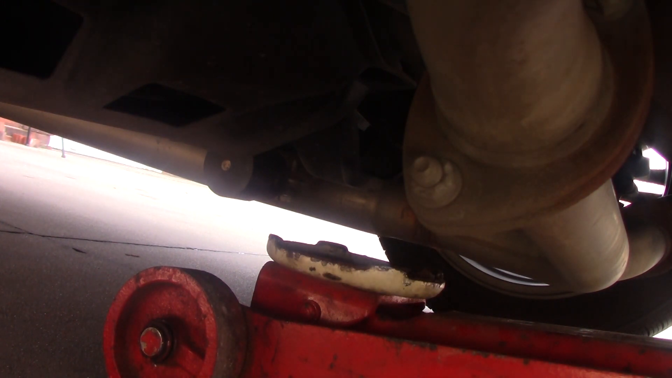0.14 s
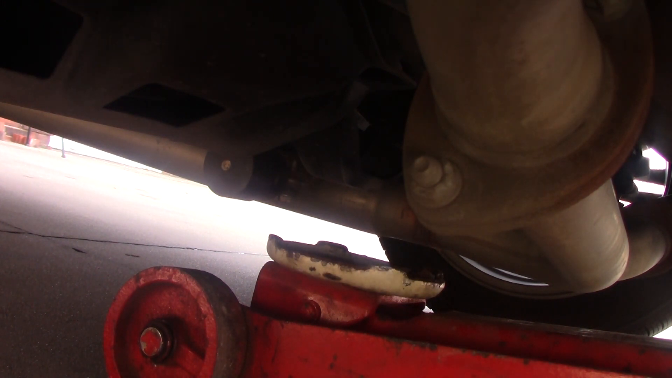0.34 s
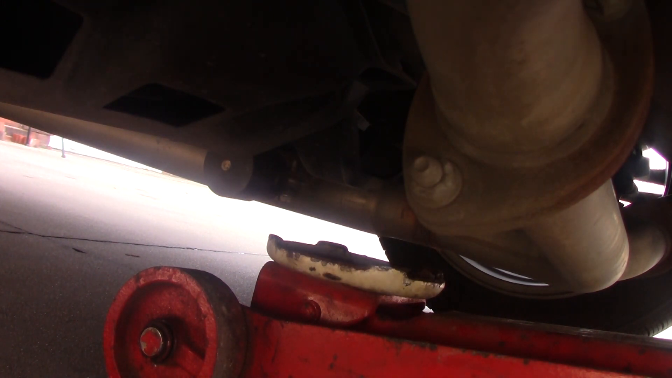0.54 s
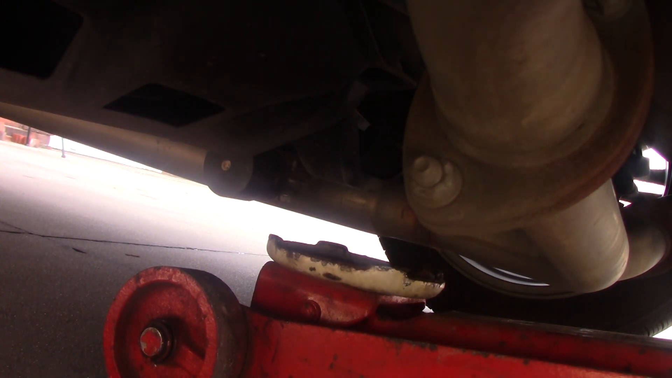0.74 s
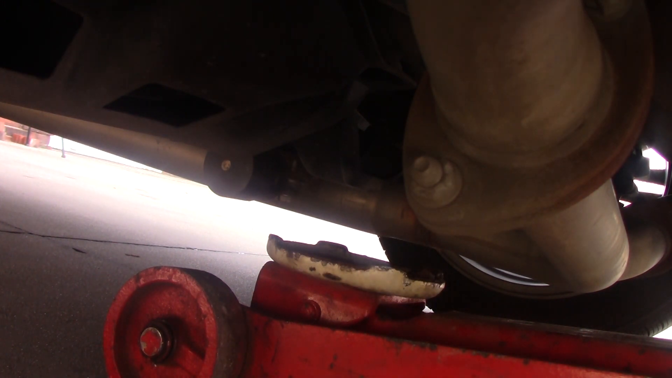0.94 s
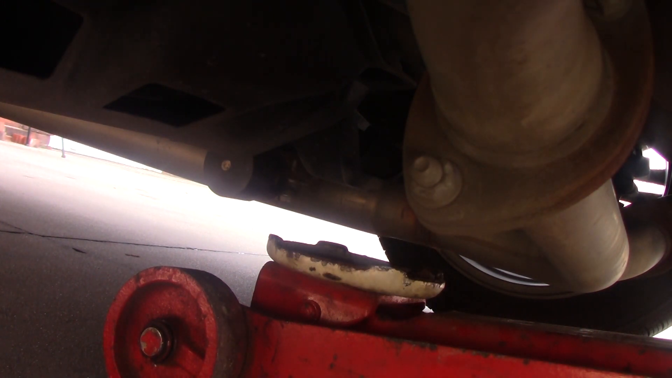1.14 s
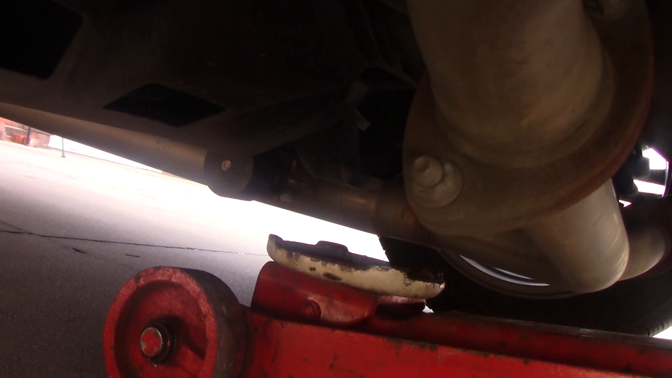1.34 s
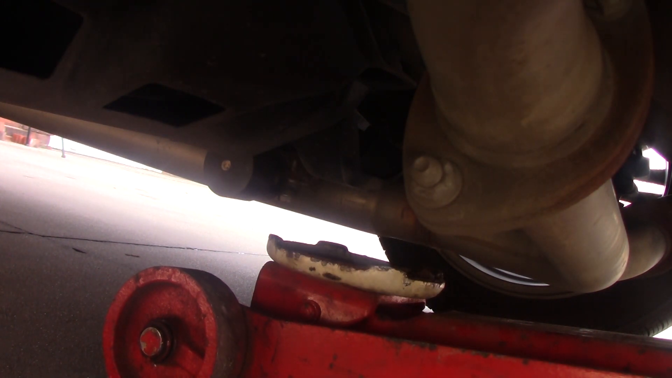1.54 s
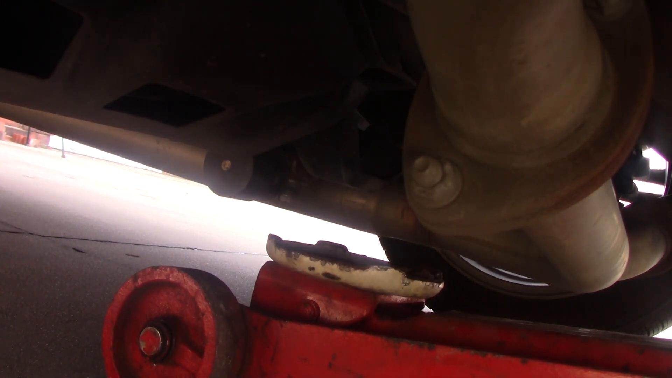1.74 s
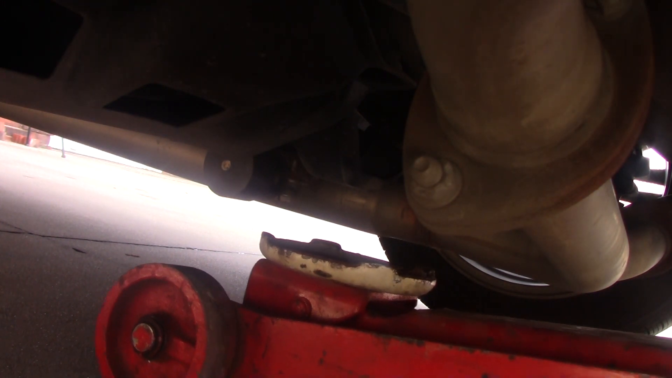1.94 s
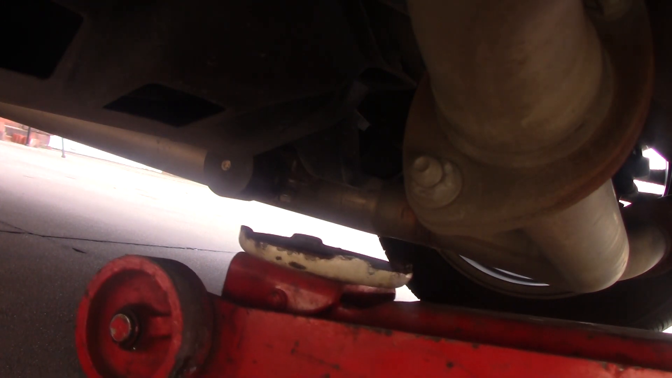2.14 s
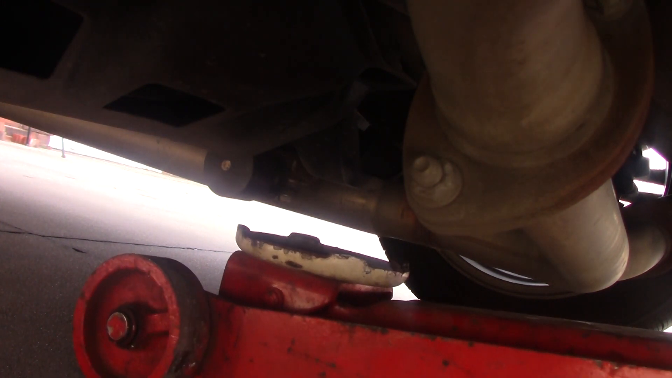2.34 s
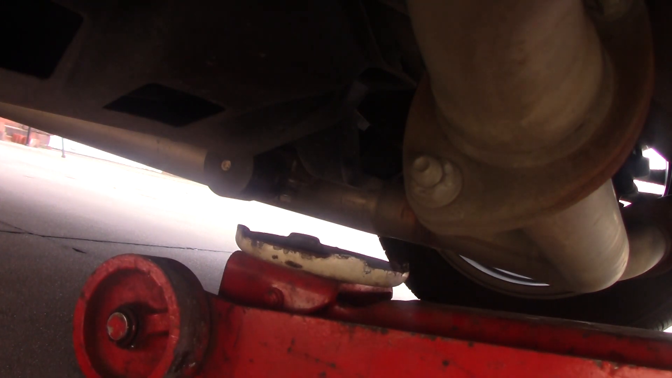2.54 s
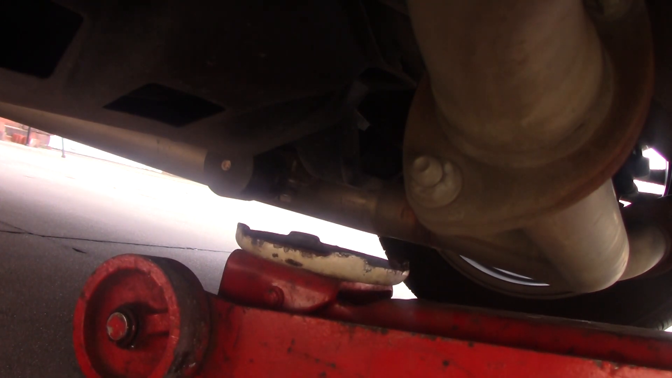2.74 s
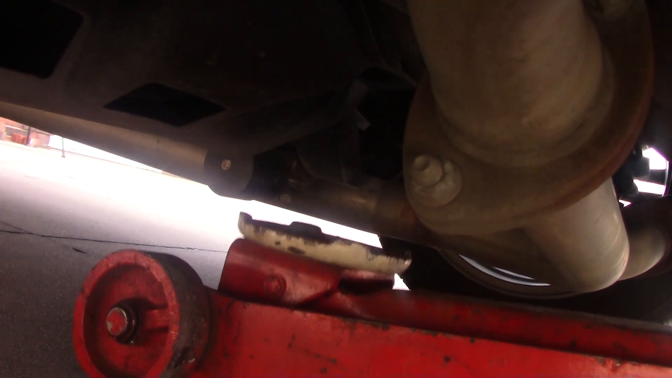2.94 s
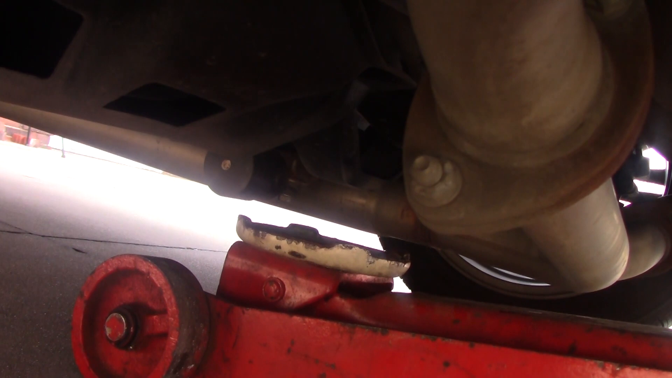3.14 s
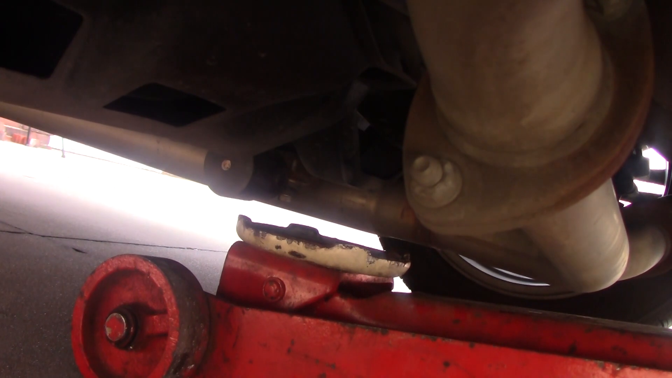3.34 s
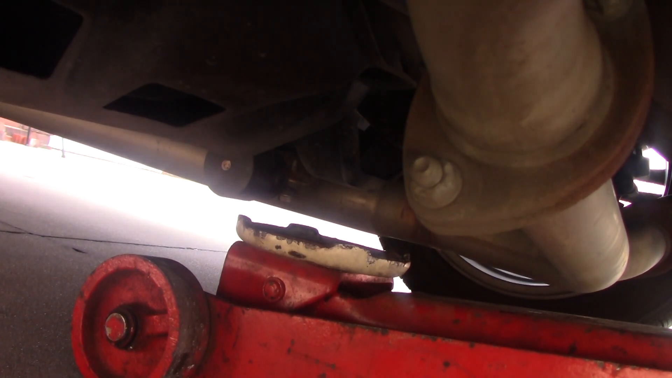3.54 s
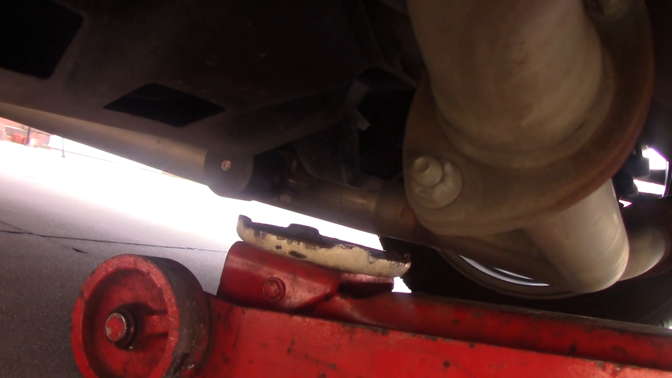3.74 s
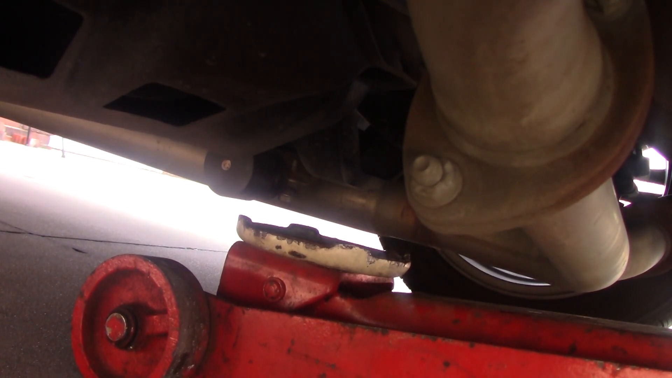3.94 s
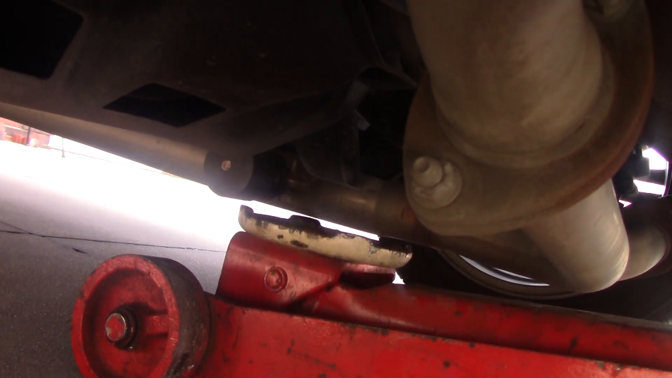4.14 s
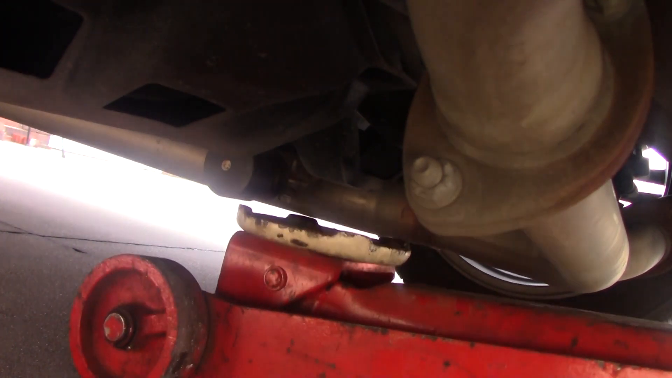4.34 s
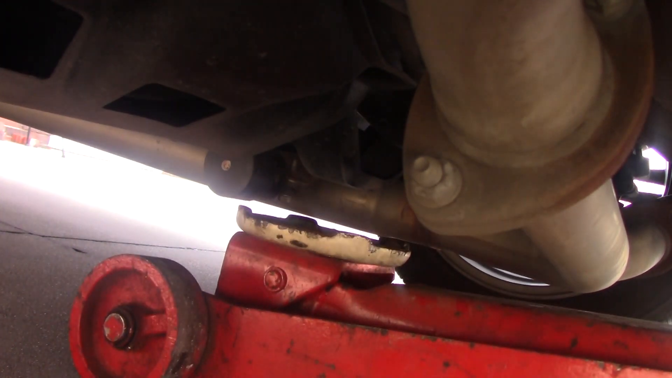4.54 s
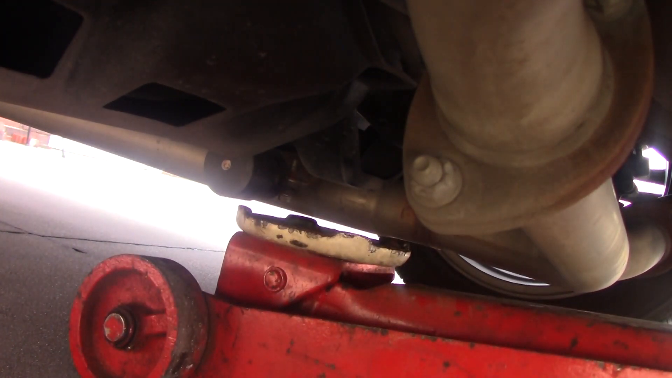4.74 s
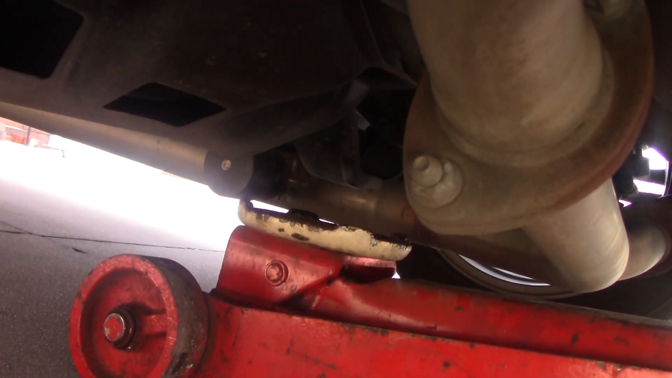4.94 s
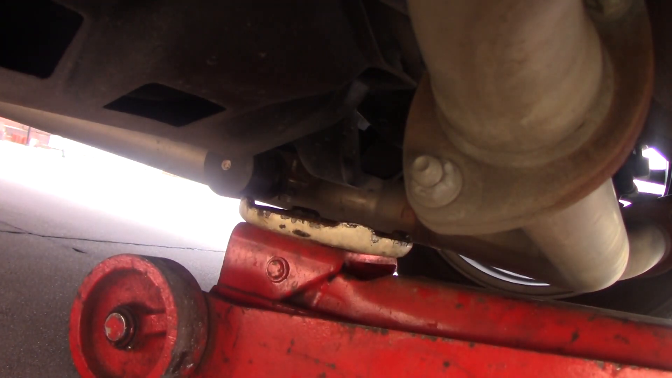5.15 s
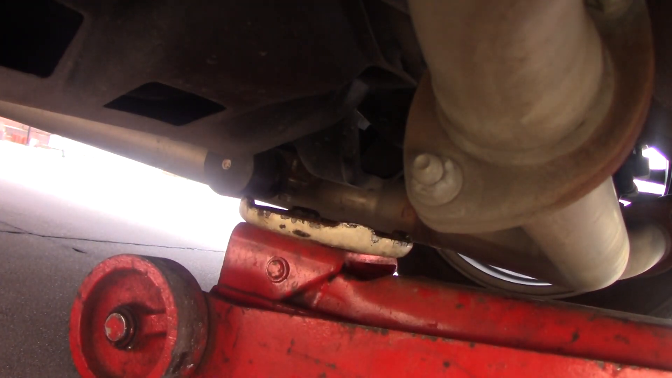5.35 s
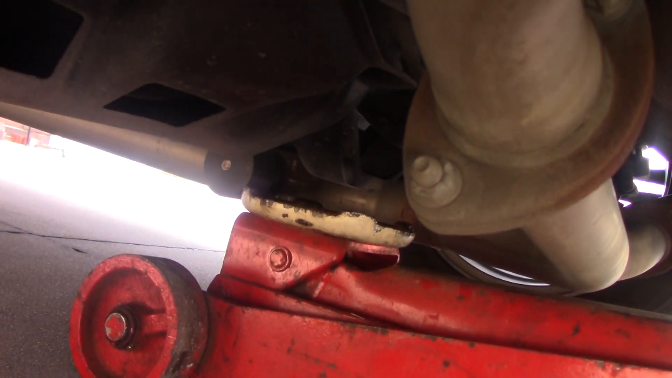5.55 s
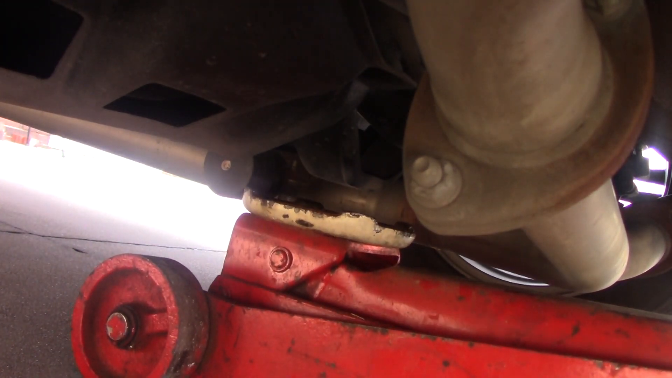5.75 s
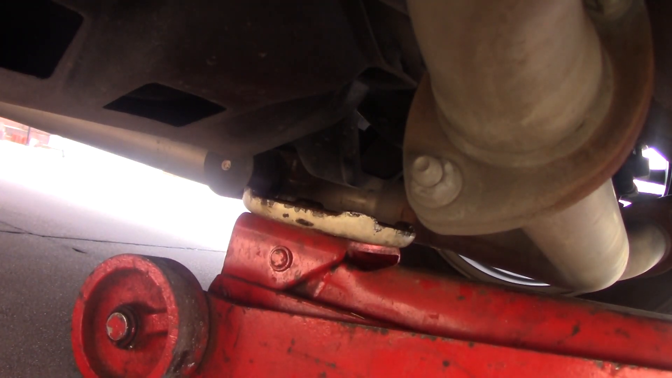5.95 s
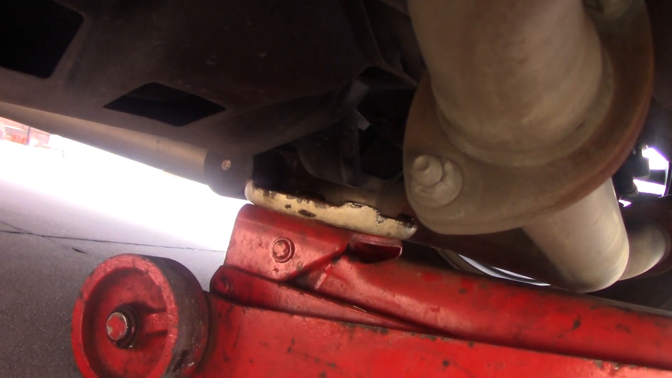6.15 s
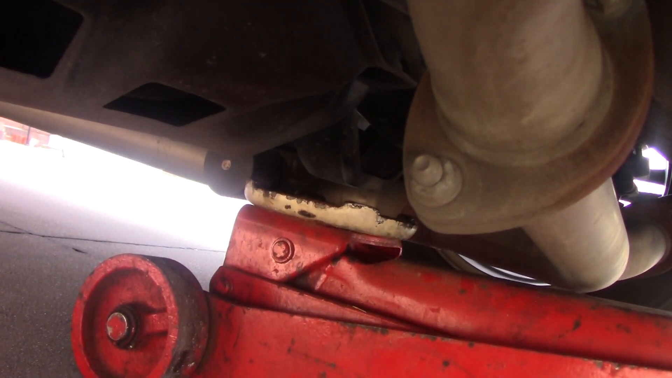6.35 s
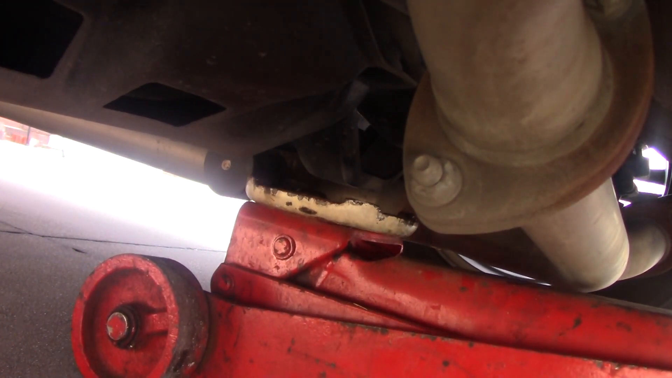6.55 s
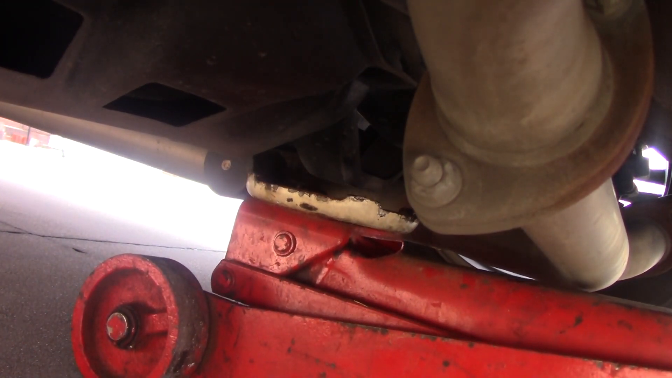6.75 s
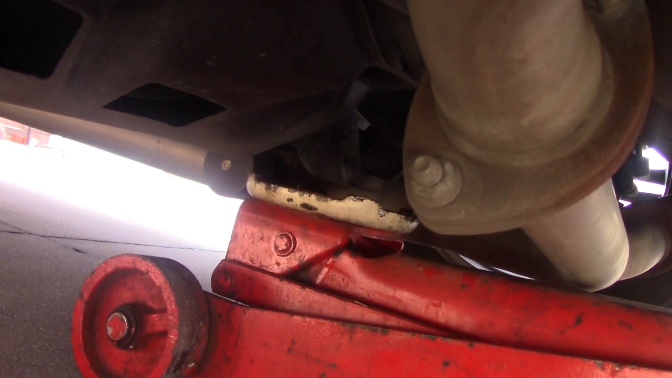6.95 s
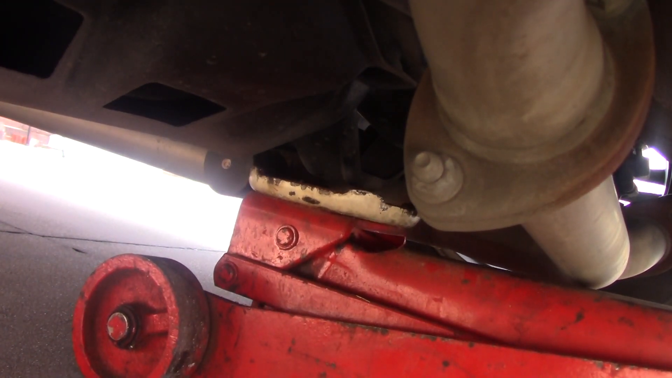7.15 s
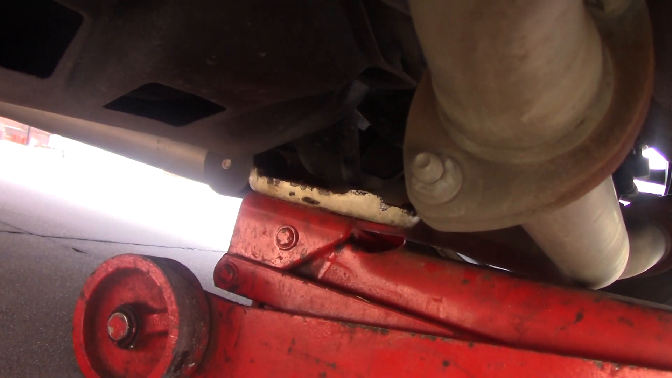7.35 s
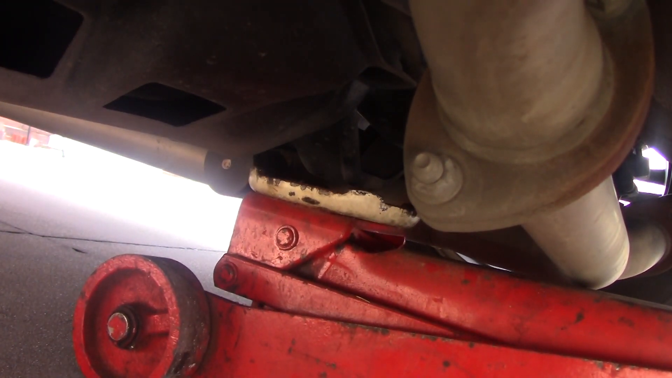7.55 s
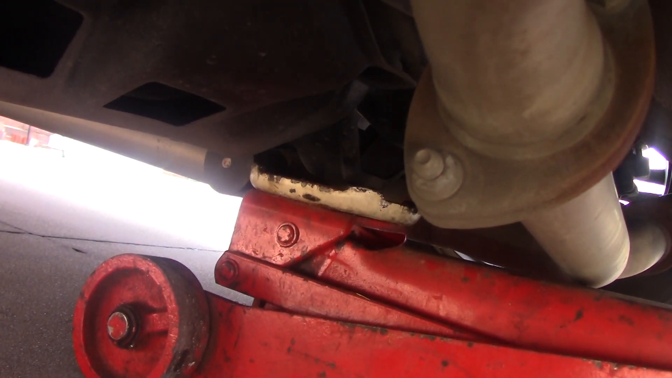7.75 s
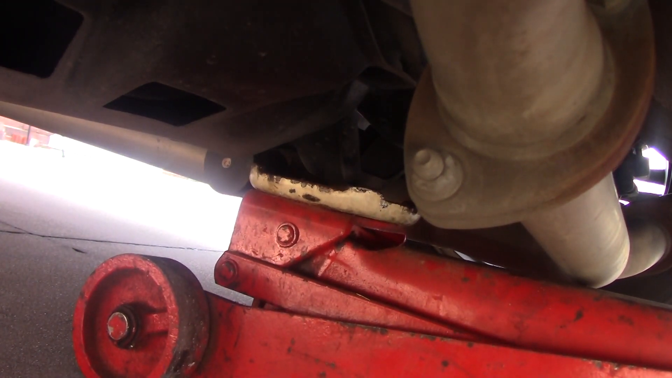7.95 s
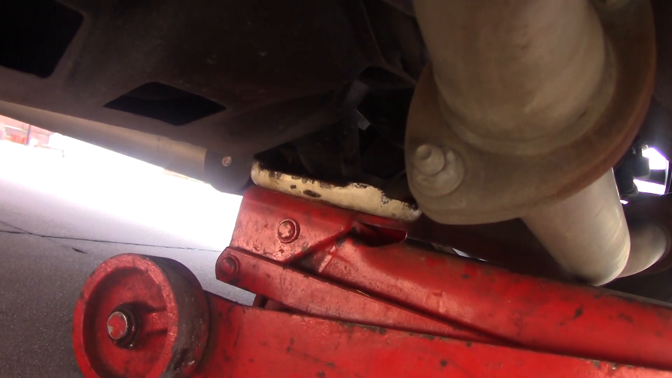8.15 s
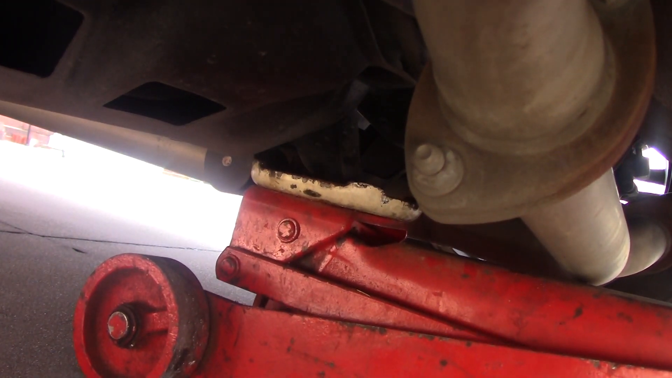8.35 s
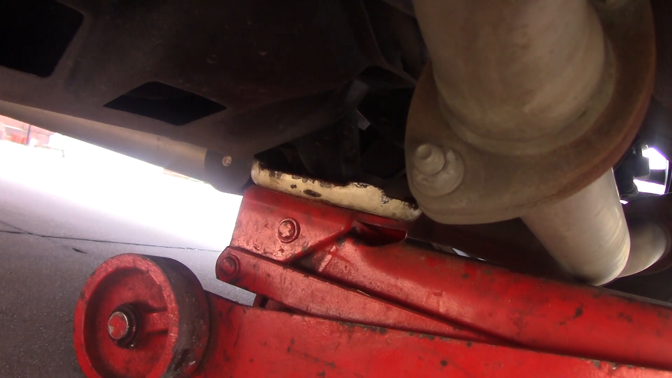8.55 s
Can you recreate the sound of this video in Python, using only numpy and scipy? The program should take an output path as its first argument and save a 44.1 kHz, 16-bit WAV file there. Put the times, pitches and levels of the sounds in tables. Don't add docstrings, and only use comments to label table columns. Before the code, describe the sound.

Low on concrete beneath a car, a soft outdoor rumble of distant traffic and air runs throughout. From 0 to 0.5 s, shoe or cloth scuffs, gritty crunches and light frame thumps; a small bump at 0.87, a lone tick at 1.08, faint knocks and grit at 1.66-1.95. At about 1.97-2.35 a dry caster squeals harshly, jumping up, then dropping and wavering with bright overtones. Clanks start at 2.4, with a heavy frame thump at 2.7. Dense clicking and rattling at 3.0-3.3 includes a brief singing tube tone; a short lull follows. Strong hollow thumps hit near 4.0, 4.85 and 5.4, between bright ringing clatter, especially 4.25-4.5. From 5.6 to 8.6, irregular rapid steel clanks, pin clicks and saddle knocks continue, close and hard with short echoes, while the rumble ducks beneath them.

```python
import sys
import numpy as np
from scipy import signal
from scipy.fft import rfft, irfft, next_fast_len
from scipy.io import wavfile
from scipy.ndimage import uniform_filter1d

SR = 44100
rng = np.random.default_rng(int(sys.argv[2]) if len(sys.argv) > 2 else 0)


def transcribe(u):
    v = np.clip(np.atleast_2d(u).T, -1, 1)
    q = np.round(v * 32767).astype(np.int16)
    wavfile.write(sys.argv[1], SR, q)


def elevation(decibels):
    levels = np.asarray(decibels, float)
    return 10 ** (levels / 20)


N = 379701
T = np.arange(N) / SR
SIZE = 8192
HZ = np.fft.rfftfreq(SIZE, 1 / SR)

# pitch_hz, width_hz, level_db
STEEL_RINGS = [(1063, 55, -5), (1247, 130, 1.5), (1576, 122, -9.5), (2368, 43, 0.5), (2752, 51, -9.5),
               (3218, 38, -1.5), (3910, 76, -8), (4230, 190, -6.5), (4980, 34, -11), (5404, 106, -5),
               (6730, 130, -22), (7440, 67, -12.5), (9730, 57, -12)]
# pitch_hz, width_hz, level_db
FRAME_RINGS = [(78.5, 46, -13.5), (129, 45, -7), (171.6, 60, -6), (253, 63, 1.5), (281.7, 50.4, 0),
               (344, 34.6, 6.5), (407.5, 50, -0.5), (491, 73, -7), (586, 54, 1), (684, 42, 0.5)]


def level(x, db):
    return x * elevation(db) / np.sqrt(np.mean(x ** 2))


def crest(wave):
    power = uniform_filter1d(wave ** 2, size=128, axis=1)
    return wave / np.sqrt(2 * power.max(axis=1))[:, None]


def colour(points, hz):
    at, db = np.transpose(points)
    return elevation(np.interp(np.log(hz + 1), np.log(at), db))


def modes(table, hz):
    f, width, db = np.transpose(table)[:, :, None]
    return elevation(db) * 1j * hz * width / (f ** 2 - hz ** 2 + 1j * hz * width)


def alternating(table):
    return (-1.) ** np.arange(len(table))


def band(lo_hz, hi_hz, hz):
    up, down = 1j * hz / lo_hz, 1j * hz / hi_hz
    low_cut = up ** 2 / (1 + np.sqrt(2) * up + up ** 2)
    return low_cut / (1 + np.sqrt(2) * down + down ** 2)


def through(x, response):
    size = next_fast_len(N + SIZE)
    return irfft(rfft(x, size) * response(np.fft.rfftfreq(size, 1 / SR)), size)[..., :N]


def walk(rate):
    k = int(SR / rate)
    return uniform_filter1d(np.repeat(rng.standard_normal(N // k + 1), k), k)[:N]


def grit(shape, scatter_db, share):
    hard = (rng.random(shape) < share) * elevation(scatter_db * np.minimum(rng.exponential(size=shape), 3))
    return rng.standard_normal(shape) * (1 + hard)


def swell(rows, rise_s, fall_db_s):
    out = 0
    for s, held, db in rows:
        rise = np.clip((T - s) / rise_s, 0, 1) ** 2
        out = out + rise * elevation(db - fall_db_s * np.maximum(T - s - rise_s - held, 0))
    return out


def sing(rows):
    out = np.zeros(N)
    for s, hz, db, driven, t60 in rows:
        on = slice(int(s * SR), int((s + 1) * SR))
        age = np.abs(T[on] - s)
        dying = elevation(db - 60 * np.maximum(age - driven, 0) / t60)
        grown = np.clip(age / driven, 0, 1) ** .5 * dying
        out[on] += np.sqrt(2) * grown * np.sin(2 * np.pi * hz * age)
    return out


def steel(hz, strike, crack_db, tune=0.99):
    # pitch_hz, level_db (per Hz)
    crack_points = [(400, -9), (700, 2.5), (1250, -10), (2100, -6), (3500, -8), (5500, -12), (9000, -16),
                    (16000, -15)]
    least_width_hz = 85
    rings = np.maximum(STEEL_RINGS, [0, least_width_hz, -np.inf])
    return strike @ modes(rings, hz / tune) + elevation(crack_db) * colour(crack_points, hz)


def metal_blows():
    # start_s, peak_db, bright_db, t60_s (time to fade by 60 dB)
    frame_thumps = [(0.183, -23.5, 8, 0.047), (0.262, -31, 16, 0.085), (0.329, -24, 4, 0.22),
                    (0.865, -25.5, -11, 0.084), (2.694, -5.5, -11.5, 0.38), (3.994, -0.5, -9.5, 0.11),
                    (4.03, -10, -4, 0.78), (4.848, -0.5, -11, 0.26), (5.377, -6, -6, 0.24),
                    (5.415, -11, -17, 0.71)]
    saddle_knocks = [(1.663, -27, 18, 0.14), (1.845, -43, 1, 0.082), (1.95, -16.5, -5, 0.039),
                     (2.818, -8.5, 11, 0.33), (2.891, -14.5, -27, 0.14), (3.205, -10, -9, 0.064),
                     (3.323, -21, -19, 0.2), (3.864, -10.5, -40, 0.14), (4.08, -1, -7, 0.23),
                     (4.119, 1, -9.5, 0.082), (4.822, -23.5, -19, 0.059), (5.075, -15.5, -11.5, 0.37),
                     (5.146, -2, -11, 0.32), (5.165, -1.5, -6.5, 0.084), (5.466, -4, -9.5, 0.65),
                     (5.499, -7, -8, 0.39), (5.725, -6, -12, 0.1), (5.965, -19.5, -41, 0.03),
                     (6.025, -14.5, -37, 0.12), (6.565, -20, -30, 0.12), (6.578, -4.5, -31, 0.17),
                     (6.631, -18, -40, 0.12), (6.709, -7, -30, 0.039), (6.759, -16, -34, 0.11),
                     (7.05, -9, 15.5, 0.14), (7.524, -11, -8.5, 0.14), (7.666, -12, -30, 0.33),
                     (7.818, -16, -31, 0.11), (8.199, -2.5, -8.5, 0.21), (8.233, -14, -30, 0.35)]
    pin_clicks = [(5.256, -8, 4, 0.057), (2.458, -14, -44, 0.029), (2.544, -17.5, -12, 0.11),
                  (2.852, -10, -11, 0.037), (3.064, -5, -4.5, 0.092), (3.165, -2, -4.5, 0.1),
                  (3.73, -11, -40, 0.047), (3.825, -5, -11, 0.078), (4.295, -2.5, 3, 0.15),
                  (4.33, -1, 3, 0.095), (4.355, -2.5, 1.5, 0.072), (4.413, -2.5, 2, 0.076),
                  (4.465, -1, -8.5, 0.12), (4.58, -12.5, -10, 0.2), (4.602, -13, -11.5, 0.11),
                  (4.922, -11, -13, 0.048), (5.017, -3, -9, 0.07), (5.804, -7.5, -9, 0.18),
                  (6.803, -4, -12.5, 0.084), (6.863, 0.5, -8.5, 0.21), (7.099, -11, -7.5, 0.053),
                  (7.166, -3, -13.5, 0.045), (7.229, -13, -51, 0.11), (7.261, -9.5, -29, 0.09),
                  (7.347, -3, -19, 0.076), (7.427, -2.5, -10.5, 0.21), (7.716, -1.5, -10, 0.21),
                  (7.891, 1, -12.5, 0.08), (6.321, -3, -25, 0.033), (8.462, -7, -11.5, 0.054)]
    handle_clanks = [(2.915, -13.5, -13, 0.18), (3.025, -9, -10, 0.098), (3.108, -5.5, -6.5, 0.22),
                     (3.22, -4.5, -11, 0.14), (4.139, -7, -9, 0.36), (4.194, -4.5, -8.5, 0.15),
                     (5.055, -11.5, -10.5, 0.14), (5.676, -2.5, -5.5, 0.13), (6.227, -3.5, -11.5, 0.15),
                     (6.271, -3, -35, 0.062), (6.783, -13, -15.5, 0.091), (6.836, -3, -31, 0.063),
                     (6.925, -17.5, -9.5, 0.041), (7.012, -32, -5, 0.03), (7.28, 1.5, -8.5, 0.11),
                     (7.734, -3, -14, 0.13), (7.836, -3, -11, 0.17), (8.366, -4, -18, 0.082),
                     (8.474, 0.5, -10.5, 0.14), (8.546, -4.5, -9.5, 0.15)]
    yoke_clatters = [(2.394, -9.5, -14, 0.12), (2.438, -5, -9.5, 0.19), (2.778, -4.5, -8, 0.14),
                     (3.091, -4.5, -4, 0.089), (4.253, -3.5, -10, 0.11), (4.532, -9, -41, 0.2),
                     (4.947, -2.5, -9, 0.3), (5.234, -2, -11, 0.16), (5.652, -7, -13.5, 0.39),
                     (5.756, -1, -9.5, 0.1), (6.33, -4.5, -13, 0.13), (7.412, -9.5, -16, 0.081),
                     (7.685, -4.5, -10.5, 0.12), (8.154, -2, -10.5, 0.16), (8.304, -3.5, -11, 0.12)]
    short_blows = [(2.406, -14.5, -10, 0.061), (2.673, -17.5, -7, 0.18), (2.83, -9, -10, 0.13),
                   (3.038, -3, 2, 0.096), (3.083, -6.5, -4, 0.044), (3.8, -34, -11, .1),
                   (3.956, -30, -25, 0.061), (4.108, -4.5, -9, 0.11), (4.271, -2, 2.5, 0.16),
                   (4.963, -5, -6, 0.066), (5.133, -12.5, -29, 0.092), (5.243, -6, -4, 0.32),
                   (5.552, -11, -8, 0.22), (5.666, -5, -6, 0.19), (6.187, -32.5, -7, 0.3),
                   (6.245, -8.5, -9, 0.058), (6.283, -18, -11, 0.14), (6.339, -2.5, -6, 0.1),
                   (6.403, -17, -23, 0.11), (6.471, -26.5, -20, .08), (6.611, -20, -9.5, 0.053),
                   (6.662, -16.5, -26, 0.04), (7.077, -13.5, -13, 0.07), (7.137, -27.5, -25, 0.074),
                   (7.293, -8.5, -13, 0.15), (7.648, -33, -27, 0.13), (7.775, -20, -7, 0.038),
                   (7.849, -3, -9.5, 0.086), (7.923, -14.5, -29, 0.072), (8.137, -23, -27, 0.046),
                   (8.168, -5, -8, 0.2), (8.279, -16, -15, 0.23), (8.319, -4, -6.5, 0.07),
                   (8.377, -8.5, -11.5, 0.088)]
    # thud_db, chatter_s, first_touch (0-1), attack_s
    kinds = [
        (3, 0.0027, 0.89, 0.00065),
        (-9, 0.0082, 0.73, 0.00063),
        (-16.5, 0.008, 0.71, 0.00042),
        (-14.5, 0.011, 0.58, 0.00068),
        (-18.5, 0.02, 0.54, 0.0014),
        (-15.5, 0.0067, 0.59, 0.00049),
    ]
    detune = .05
    snap_db, snap_s = 3.5, .0015
    contact_scatter_db, knock_scatter_db = 4.5, 3
    strike_scatter_db, frame_scatter_db = 5.5, 3
    treble_power = 0.7

    tables = frame_thumps, saddle_knocks, pin_clicks, handle_clanks, yoke_clatters, short_blows
    s, peak_db, bright_db, t60 = np.vstack(tables).T[:, :, None]
    shared = np.repeat(kinds, [len(rows) for rows in tables], axis=0)
    thud_db, lasting, first, attack = shared.T[:, :, None]
    age = np.arange(SIZE) / SR
    lasting = np.clip(lasting, .001, .07)

    closing = first + (1 - first) * np.minimum(age / lasting, 1)
    building = np.minimum(age / attack, 1) * closing
    chatter = building * elevation(-60 * np.maximum(age - lasting, 0) / np.clip(t60, .015, .3))
    snap = np.exp(-np.maximum(age - attack, 0) / snap_s)
    chatter = chatter * (1 + first * elevation(snap_db) * snap)

    knocks = np.repeat(rng.standard_normal((len(s), SIZE // 128)), 128, axis=1)
    knocks[:, :256] = 1
    force = elevation(knock_scatter_db * uniform_filter1d(knocks, size=64, axis=1))
    push = rfft(grit((len(s), SIZE), contact_scatter_db, 0.0071) * chatter * force)

    parts = len(STEEL_RINGS)
    strike = rng.standard_normal((len(s), parts + len(FRAME_RINGS)))
    steel_parts, frame_parts = [], []
    for row in strike:
        struck = alternating(STEEL_RINGS) * elevation(strike_scatter_db * np.tanh(row[:parts]))
        steel_parts.append(steel(HZ, struck, -5.0, 1 + detune * row[-1]))
        shaken = alternating(FRAME_RINGS) * elevation(frame_scatter_db * row[parts:])
        frame_parts.append(shaken @ modes(FRAME_RINGS, HZ * (1 + 2 * detune * row[0])))
    metal = push * steel_parts

    bright_db = -np.abs(bright_db)
    top_hz = 16000 * elevation(1.23 * bright_db)
    body = crest(irfft(metal * band(344, 1760, HZ)))
    treble = crest(irfft(metal * band(1404, top_hz, HZ)) * chatter ** treble_power)
    clank = body + treble * elevation(1.454 * bright_db + 14.0)
    thud = crest(irfft(push * frame_parts))
    blows = elevation(peak_db - 1.5) * (crest(clank) + elevation(thud_db + 4.0) * thud)
    blows = blows * np.minimum(age[::-1] / 0.051, 1)
    out = np.zeros(N + SIZE)
    for start, blow in zip((s[:, 0] * SR).astype(int), blows):
        out[start:start + SIZE] += blow
    return out[:N]


def caster_squeal():
    # start_s, slip_rate_hz, pressure_db
    slips = [(1.955, 572, -41), (1.974, 585, -25), (1.99, 600, -22), (1.996, 692, -9), (2.021, 697, -4),
             (2.074, 700, -2), (2.081, 528, -5), (2.112, 517, -7), (2.13, 538, -5.5), (2.148, 504, -4.5),
             (2.188, 487, -4), (2.206, 500, -6), (2.234, 524, -7.5), (2.246, 560, -8), (2.284, 564, -11),
             (2.298, 546, -14), (2.325, 538, -26), (2.36, 546, -38)]
    # pitch_hz, width_hz, level_db
    caster_rings = [(2230, 40, 35), (2430, 28, 3), (3200, 30, 35.5), (3830, 78, 22), (5476, 90, 26.5)]
    # pitch_hz, width_hz, level_db
    fork_rings = [(558, 25, -3.5), (710, 77, 0.5), (1090, 220, -10.5), (1510, 94, -8.5), (1700, 100, -8.5)]
    fork_floor_db = -58
    jump_s, jump_dip_db_per_khz_s = .003, -.2
    loose_db, stiff_db, locked_db = -5, -8, -11.5
    slip_waver, partial_top_hz = .012, 7600
    scrape_db, screech_db, half_slip_db = -11, -15, -26

    s, rate_hz, db = np.transpose(slips)
    on = slice(int(s[0] * SR) + 1, int(s[-1] * SR))
    hz = uniform_filter1d(np.interp(T[on], s, rate_hz), int(jump_s * SR))
    jumping = uniform_filter1d(np.abs(np.gradient(hz)), int(3 * jump_s * SR)) * SR / 1000
    pressure_db = np.interp(T[on], s, db) + jump_dip_db_per_khz_s * jumping
    upper_db = pressure_db + np.interp(hz, [530, 555, 650], [loose_db, stiff_db, locked_db])
    ragged = np.where(hz > 650, .6, 1.2)
    turn = 2 * np.pi * np.cumsum(hz * (1 + slip_waver * ragged * walk(220)[on])) / SR

    low = 0
    for k in (1, 2, 3):
        fork = elevation(fork_floor_db) + np.abs(modes(fork_rings, k * hz)).max(axis=0)
        unsteady = elevation(pressure_db + 4.5 * ragged * walk(70)[on])
        low = low + fork * unsteady * np.sin(k * turn + k)

    upper, power = 0, 0
    for k in range(4, 26):
        gain = 10.0 / k ** 2 + np.abs(modes(caster_rings, k * hz)).sum(axis=0)
        gain = gain * elevation(5.3 * ragged * walk(110)[on]) / (1 + (k * hz / partial_top_hz) ** 6)
        upper = upper + gain * np.sin(k * turn + k * k)
        power = power + gain ** 2
    upper = upper / np.sqrt(power)

    pulse = 1 + np.cos(turn)
    scrape = through(rng.standard_normal(N), lambda f: band(1050, 3700, f))[on] * pulse
    screech = through(rng.standard_normal(N), lambda f: band(3800, 4400, f) ** 2)[on] * pulse
    screech = level(screech, screech_db) * (hz < 520)
    uneven = 1 + elevation(half_slip_db + 6 * walk(39.73)[on]) * (hz < 650) * np.cos(turn / 2)
    tone = np.sqrt(2) * uneven * (low + elevation(upper_db - 3.0) * upper)
    out = np.zeros(N)
    out[on] = screech * elevation(upper_db) + tone + level(scrape, scrape_db) * ragged * elevation(upper_db)
    return out


def fork_strands():
    # start_s, pitch_hz, level_db, driven_s, t60_s
    strands = [
        (1.965, 575, -19, .025, .07),
        (1.97, 1150, -25, .02, .05),
        (1.97, 1730, -24, .02, .04),
        (2.305, 542, -20, .02, .2),
        (2.02, 1200, -27, .02, .06),
    ]
    return sing(strands)


def axle_whistle():
    pitch_hz, width_hz, patchy_db = 12080, 76, 11
    noise = rng.standard_normal(N)
    whistle = through(noise, lambda hz: modes([(pitch_hz, width_hz, 0)], hz)[0] ** 2)
    return level(whistle, -46) * elevation(patchy_db * walk(35)) * swell([(1.93, 0.38, 0)], .03, 500)


def plate_booms():
    # start_s, pitch_hz, level_db, driven_s, t60_s
    plate_tones = [(2.696, 358, -14, 0.011, 0.18), (2.721, 278, -18, .03, .2),
                   (3.997, 361, -15, 0.014, 0.16), (4.03, 288, -12, .03, .2), (4.85, 341, -8, 0.013, 0.2),
                   (4.865, 259, -4.5, 0.017, 0.089), (5.155, 341, -24, 0.022, .2),
                   (5.382, 358, -3.5, 0.018, .13), (5.43, 257, -13, 0.02, 0.16),
                   (5.48, 202, -12.5, 0.016, 0.14), (2.76, 200, -20, 0.023, .15), (.18, 300, -24, .03, .15),
                   (.325, 287, -20, 0.014, .1), (7.53, 584, -28, .01, .1), (7.76, 594, -14.5, 0.0071, 0.11),
                   (8.16, 589, -18, 0.024, 0.13), (8.195, 608, -8.5, 0.0091, 0.074)]
    return sing(plate_tones)


def long_bars():
    # start_s, pitch_hz, level_db, driven_s, t60_s
    bar_tones = [(3.2, 576, -36, .04, 2.5), (3.17, 2372, -46, .05, 1.2), (3.11, 5350, -22.5, .045, .067),
                 (3.04, 9430, -38, .05, .5), (3.035, 4500, -14, .012, .04), (3.062, 4950, -18, .02, .04),
                 (7.29, 4850, -17, .008, .05), (7.77, 3300, -20, .012, .04), (3.162, 2600, -11, .007, .041),
                 (4.4, 576, -37, .039, .8), (2.46, 2400, -19, .01, .12), (4.29, 4932, -20.5, .03, .2),
                 (4.352, 2620, -16, .009, .054), (4.411, 2620, -14, .008, .041),
                 (5.67, 4932, -21, .022, .12), (5.73, 2372, -25, .013, .08), (5.799, 2372, -24, .015, .08),
                 (6.23, 3100, -15, .008, .05), (6.865, 2372, -19, .025, .07), (7.097, 4400, -16, .01, .02),
                 (7.44, 3261, -17.5, .035, .086), (7.9, 4750, -37, .02, .12), (4.96, 9430, -40, .03, .2),
                 (5.26, 9430, -39, .03, .18), (8.2, 9430, -43, .03, .3), (8.47, 3950, -22, .03, .1),
                 (7.9, 576, -31.5, .026, .61)]
    return sing(bar_tones)


def handle_tube():
    # start_s, held_s, level_db, fall_db_per_s
    rubs = [
        (3.12, 0.13, -19.5, 152),
        (4.362, 0.13, -14, 203),
    ]
    rise_s, tube_hz = 0.033, 2159
    beat_hz, beat_db, beat_fall_db_s = 11.3, -8, 45
    out = np.zeros(N)
    for *row, fall_db_s in rubs:
        age = np.maximum(T - row[0] - rise_s, 0)
        beat = 1 + elevation(beat_db - beat_fall_db_s * age) * np.cos(2 * np.pi * beat_hz * age)
        out += np.sqrt(2) * swell([row], rise_s, fall_db_s) * beat * np.sin(2 * np.pi * tube_hz * T)
    return out


def metal_ticks():
    # start_s, peak_db
    clatter_ticks = [(2.4028, -15), (2.4383, -5), (2.4592, -5), (3.034, 7), (3.0393, 5), (3.167, 7),
                     (3.7334, -27), (3.8305, -17), (3.9941, 0), (4.0825, 0), (4.2576, -4), (4.3563, 6),
                     (4.8459, 2), (4.947, -10), (4.963, 0), (5.014, -3), (5.1555, -8), (5.157, 1),
                     (5.1655, -5), (5.235, -16), (5.3785, 4), (5.6559, -17), (5.666, -4), (5.7617, -3),
                     (6.2291, -10), (6.321, -1), (6.583, -9), (6.7095, -9), (6.8357, -11), (6.8696, 0),
                     (7.0507, -22), (7.1679, -15), (7.2816, 0), (7.347, -7), (7.4149, -14), (7.4263, -4),
                     (7.6838, -8), (7.8404, -4), (8.1567, -12), (8.3069, 0), (8.3697, -11), (8.464, -9),
                     (8.466, -4), (8.5468, -10)]
    # start_s, peak_db
    lone_tick = (1.0815, -5)
    tick_db, tail_db, t60_s = -7, -4, 0.053
    age = np.arange(SIZE // 4) / SR
    rows = np.vstack([np.add(clatter_ticks, [0, tick_db]), lone_tick])
    touch = rng.standard_normal((len(rows), len(age))) * elevation(tail_db - 60 * age / t60_s) / 4
    touch[:, 0] = 1
    out = np.zeros(N + SIZE)
    for (s, db), wave in zip(rows, touch):
        out[int(s * SR):int(s * SR) + len(age)] += elevation(db) * wave
    return 5 * through(out[:N], lambda hz: band(1300, 3900, hz))


def loose_rattle():
    # start_s, held_s, level_db
    shakes = [
        (2.68, 0.057, -14),
        (3.02, 0.14, -21),
        (4.0, 0.16, -17.5),
        (4.27, 0.15, -15),
        (4.88, 0.094, -49),
        (5.39, 0.054, -14.5),
        (5.65, 1.63, -33.5),
        (8.1, 0.55, -57),
    ]
    noise = grit(N, 5, 0.011) * elevation(3 * walk(49))
    pins = through(noise, lambda hz: steel(hz, alternating(STEEL_RINGS), 0.42))
    body = level(through(pins, lambda hz: band(460, 3900, hz)), -7.0)
    bright = level(through(pins, lambda hz: band(910, 10500, hz)), -11)
    return swell(shakes, 0.024, 143) * (body + bright)


def wheel_judder():
    # start_s, held_s, level_db
    judders = [
        (.15, 0.043, -22),
        (2.693, 0.065, -7),
        (3.995, 0.071, -7.5),
        (4.847, 0.012, -13),
        (5.38, 0.016, -1.5),
        (5.96, 0.011, -14.5),
    ]
    noise = grit(N, 2.8, 0.002) * elevation(1.8 * walk(27))

    def frame(hz):
        return alternating(FRAME_RINGS) @ modes(FRAME_RINGS, hz) * band(51, 420, hz)

    return swell(judders, 0.004, 117) * level(through(noise, frame), -3.0)


def shoe_shuffle():
    # start_s, held_s, level_db
    shuffles = [(.0, 0.15, -39.5), (.1, 0.0087, -38.5), (.19, 0.021, -44), (.29, 0.029, -35.5),
                (.38, 0.071, -28), (.46, 0.033, -32.5), (.8, 0.034, -36.5), (.95, 0.17, -44.5),
                (1.58, 0.039, -44), (1.77, 0.0082, -54), (2.61, 0.016, -36.5)]
    # pitch_hz, level_db (per Hz)
    hiss_points = [(900, 6.5), (1500, 7.5), (3000, 2), (5200, 2.5), (9000, -2.5), (16000, -2.5)]
    # pitch_hz, width_hz, level_db
    hiss_rings = [(1600, 110, -6), (3100, 460, 1), (4220, 430, -4.5), (5070, 92, 3), (8200, 170, -9)]
    noise = grit(N, 4.2, 0.0055) * elevation(2.0 * walk(37.5))

    def rough(hz):
        return colour(hiss_points, hz) * (1 + modes(hiss_rings, hz).sum(axis=0))

    return swell(shuffles, 0.051, 109) * level(through(noise, rough), 0.42)


def grit_crunch():
    # start_s, level_db, t60_s
    crushes = [(.055, -43, .05), (4.563, -30, 0.045), (0.138, -29, 0.047), (.152, -20.5, 0.059),
               (.176, -25, 0.076), (.201, -29, 0.048), (0.234, -25, 0.1), (.265, -32, .05),
               (.295, -32, 0.049), (.325, -39, 0.11), (.868, -35, .06), (1.055, -38, .04),
               (1.663, -28.5, 0.065), (1.688, -38, .05), (1.715, -36, .08), (1.826, -31.5, .04),
               (1.839, -33, .07), (3.062, -7, 0.026), (3.082, -1, 0.03), (6.797, -32, 0.073),
               (6.836, -17.5, 0.051), (6.93, -32, 0.11), (6.948, -27, 0.09), (7.013, -26, 0.063),
               (7.18, -30, 0.18)]
    gain = np.zeros(N)
    for s, db, t60 in crushes:
        on = slice(int(s * SR), int(s * SR) + SIZE)
        gain[on] += elevation(db - 60 * (T[on] - s) / max(t60, .015))
    return level(through(rng.standard_normal(N), lambda hz: band(3500, 14100, hz)), 0) * gain


def yard():
    # pitch_hz, level_db (per Hz)
    rumble_points = [(40, -30), (65, -1.5), (160, 0.5), (700, -7), (1100, -14), (2200, -26), (8000, -36.5),
                     (16000, -40)]
    # start_s, level_db
    rumble_gain = [
        (0, -30.5),
        (1.95, -29.5),
        (2.1, -32.5),
        (3.5, -36),
        (3.95, -34.5),
        (4.75, -36.5),
        (8.61, -31.5),
    ]
    air = through(rng.standard_normal((2, N)), lambda hz: colour(rumble_points, hz))
    gain = elevation(np.interp(T, *np.transpose(rumble_gain)) + 1.3 * walk(3.65))
    return level(air[0], 0) * gain, level(air[1], -23) * gain


def scene():
    # pitch_hz, side_minus_mid_db
    side_points = [(60, -9), (130, -20), (300, -31), (600, -35), (1300, -24), (4400, -20), (9000, -19),
                   (13000, -24)]
    echo_db = -11
    jack = metal_blows() + caster_squeal() + fork_strands() + axle_whistle()
    jack += plate_booms() + long_bars() + handle_tube() + metal_ticks()
    jack += loose_rattle() + wheel_judder() + shoe_shuffle() + grit_crunch()
    age = np.arange(SIZE) / SR
    echo_t60_s = np.array([[.12], [.03]])
    echo, spread = rng.standard_normal((2, SIZE)) * elevation(-60 * age / echo_t60_s)
    mid = jack + signal.fftconvolve(jack, elevation(echo_db) * echo / np.linalg.norm(echo))[:N]
    side = signal.fftconvolve(jack * walk(30), spread / np.linalg.norm(spread))[:N]
    side = through(side, lambda hz: colour(side_points, hz))
    air_mid, air_side = yard()
    return mid + air_mid + np.array([[1], [-1]]) * (elevation(9.5) * side - 0.024 * mid + air_side)


def top_cut(x):
    return signal.sosfilt(signal.butter(12, 15600, fs=SR, output="sos"), x)


def record(dry):
    held = dry / (1 + np.abs(dry) ** 5) ** (1 / 5)
    heard = through(held, lambda hz: band(64, 13200, hz) * band(36, 13400, hz))
    mix = np.clip(0.81 * heard, -.97, .97)
    return top_cut(mix)


dry = scene()
out = record(dry)
transcribe(out)
```